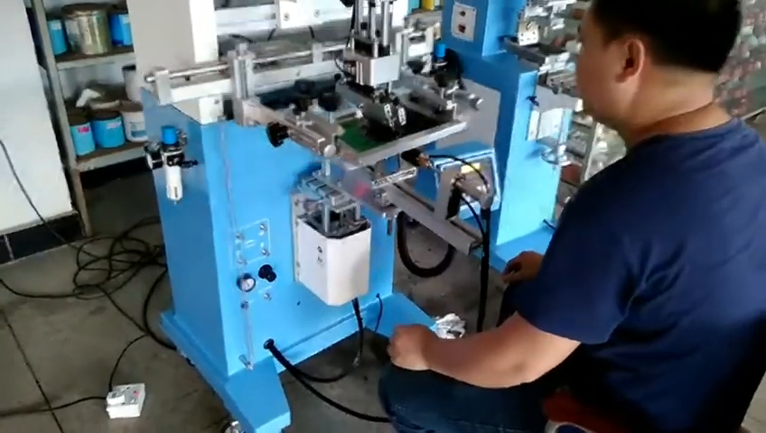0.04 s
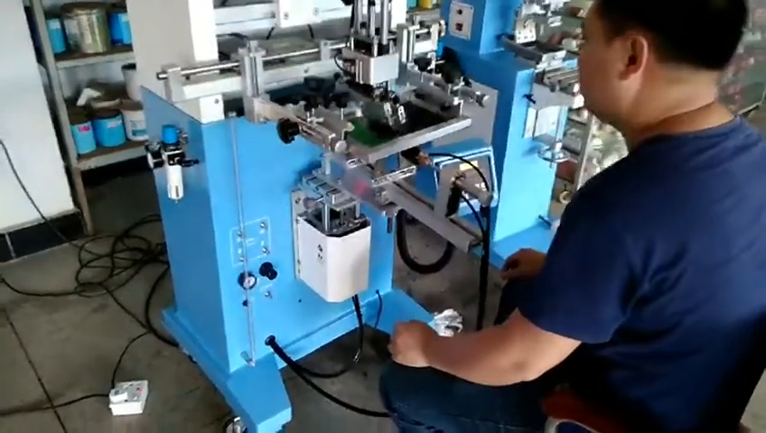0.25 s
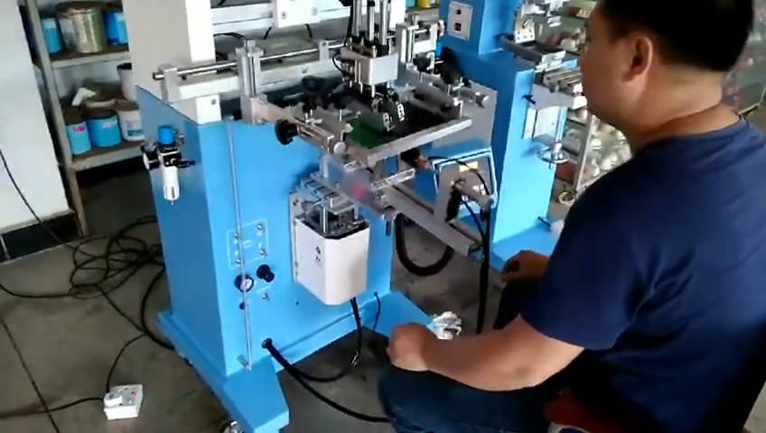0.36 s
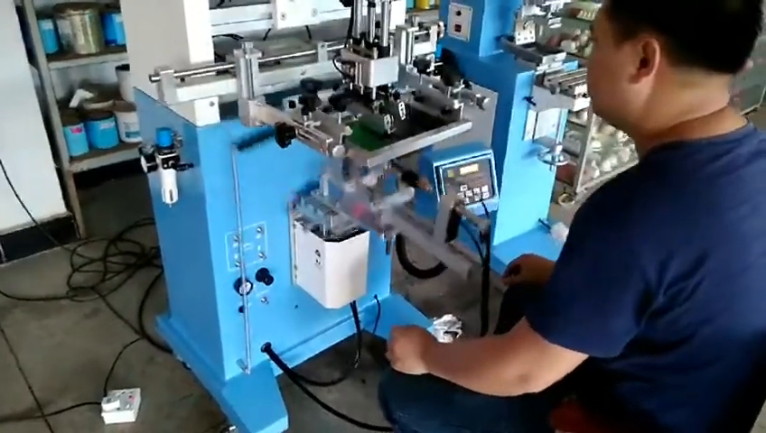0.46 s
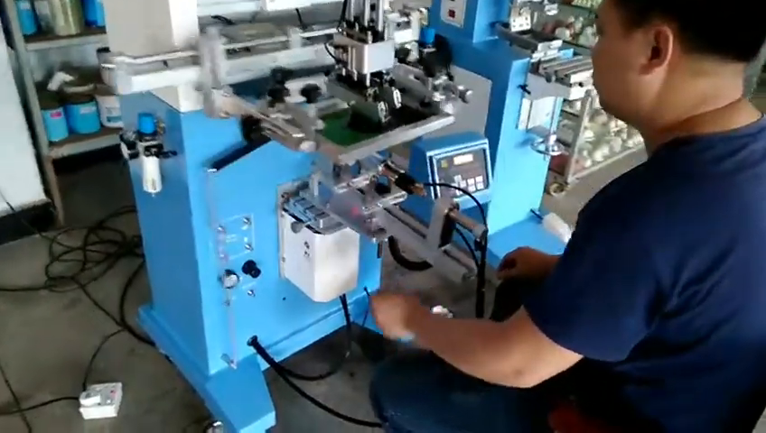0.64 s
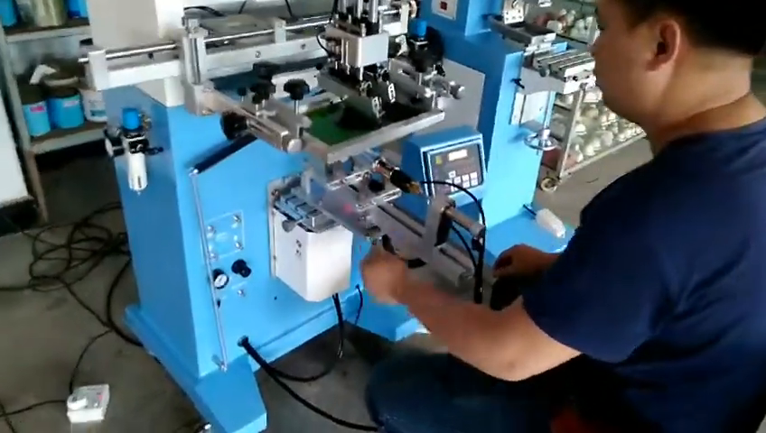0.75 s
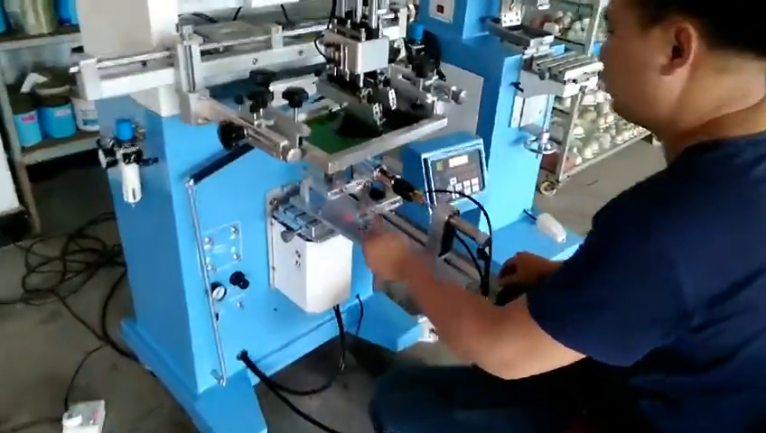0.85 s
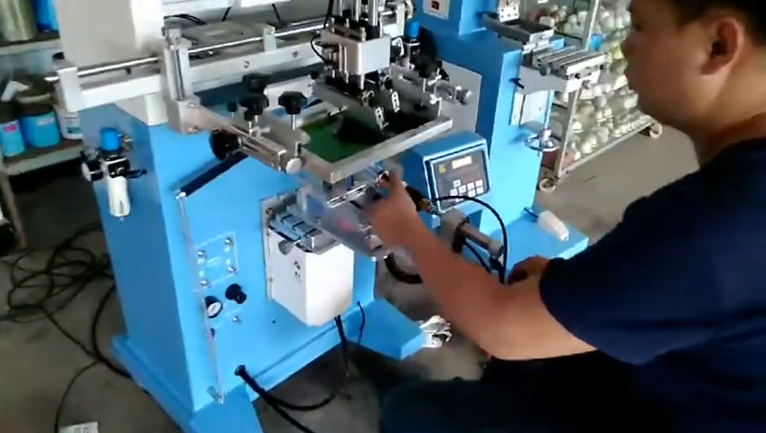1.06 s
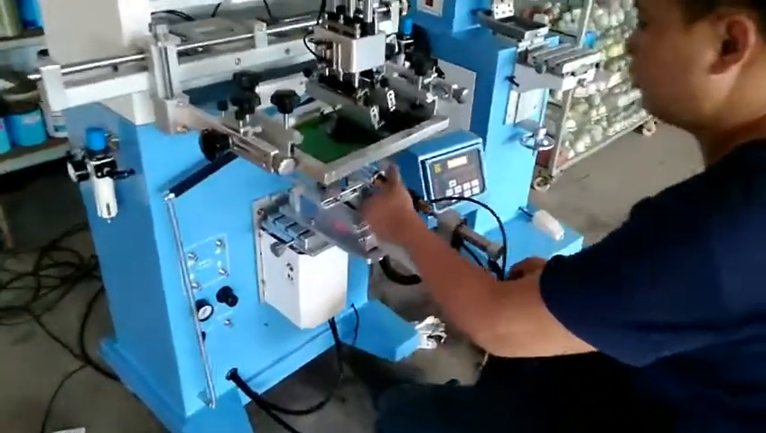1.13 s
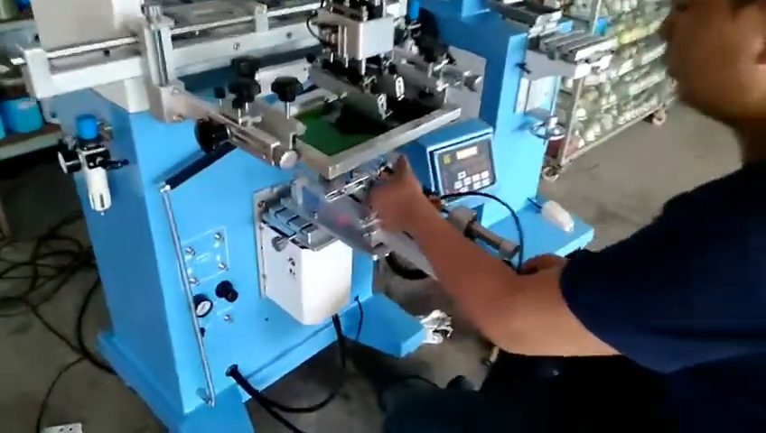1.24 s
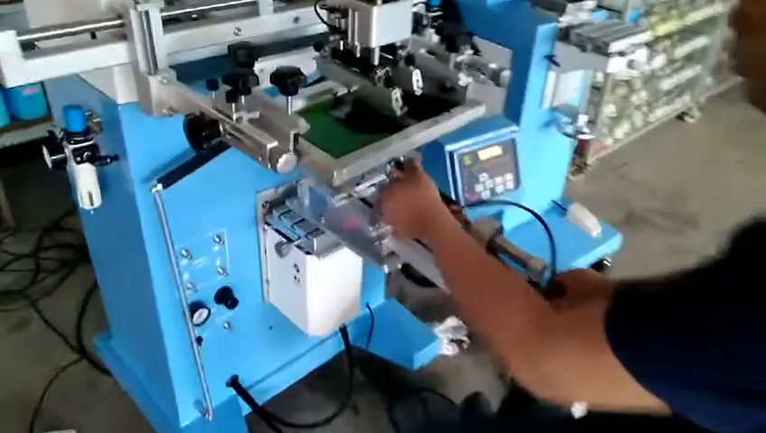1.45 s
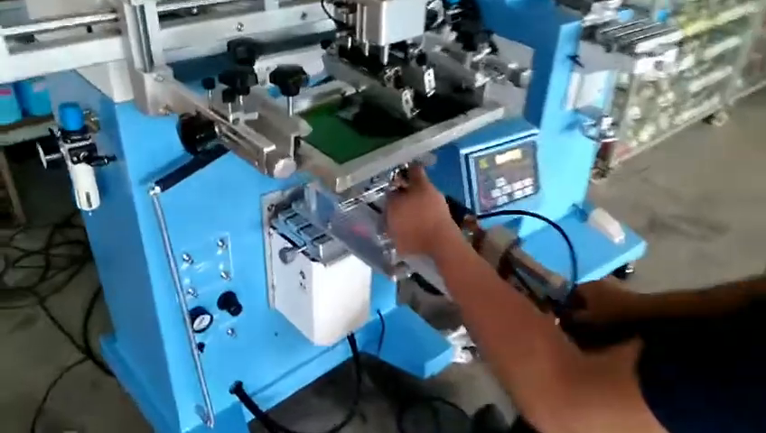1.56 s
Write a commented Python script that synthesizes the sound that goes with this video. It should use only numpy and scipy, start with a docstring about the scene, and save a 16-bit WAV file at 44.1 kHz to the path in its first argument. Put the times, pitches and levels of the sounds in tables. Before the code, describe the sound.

Compressed air hisses twice from a working printing machine, first thin and high, then fuller. Its sliding carriage drones low and clacks against steel, and a few soft thumps die away over quiet workshop noise.

```python
"""Two valves of a pneumatic screen-printing machine vent in turn: turbulent jets hiss through
their silencers, the first thin and bright, the second broad, with resonant peaks.
The machine makes one stroke: its carriage slides, sets the sheet-steel cabinet droning in its
normal modes and hits a stop. With the second hiss the rollers rumble, then impacts on the
steel rattle out over the faint noise of the workshop."""
import sys
import numpy as np
from scipy import signal
from scipy.fft import rfft, irfft
from scipy.io import wavfile
from scipy.ndimage import uniform_filter1d

SR = 44100
rng = np.random.default_rng(int(sys.argv[2]) if len(sys.argv) > 2 else 0)


def to_wav(sig):
    """Store sig (one row per channel, or 1-D mono) as 16-bit WAV at the path in sys.argv[1].

    Samples outside -1..1 are clipped; the rate is SR.
    """
    pcm = np.clip(np.atleast_2d(sig), -1, 1) * 32767
    pcm = np.round(pcm).astype(np.int16)
    wavfile.write(sys.argv[1], SR, pcm.T)  # frames by channels


N = 70560
TIME = np.arange(N) / SR
FREQS = np.maximum(np.arange(N // 2 + 1) * SR / N, 1)

# likeness of the sound at the two ears: f/Hz, coherence
COHERENCE = [(60, 0.97), (130, 0.96), (290, 0.94), (640, 0.67), (1400, 0.028), (15000, 0.032)]
# spectrum of the room noise: f/Hz, level/dB
ROOM_SPECTRUM = [(25, -23), (85, -6.5), (170, -8.5), (520, -17.5), (1200, -20), (2400, -20.5), (5000, -30),
                 (9000, -36.5), (12500, -30.5), (15500, -39.5)]
# normal modes of the cabinet: f/Hz, level/dB, T60/s
CABINET_MODES = [(56.6, -26, 0.13), (87.9, 2, 0.2), (124, -5, 0.36), (163.3, -2.5, 0.16),
                 (198.6, -4.5, 0.22), (235.4, -13.5, 0.24), (255, 1.5, 0.059), (282.3, 3, 0.15),
                 (332, 0.5, 0.18), (399, 1, 0.1)]
# runs of the carriage: t/s, rise/s, hold/s, release/(dB/s), low rumble/dB, upper rumble/dB, rubbing/dB
CARRIAGE_RUNS = [(-0.11, 0.43, 0.007, 119, -54.5, -47, -58), (0.397, 0.057, 0.018, 45, -40.5, -41, -59.5),
                 (0.64, 0.074, 0.12, 118, -32.5, -44, -55)]
# spectra of the two rolling excitations and of rail friction: f/Hz, level/dB
LOW_RUMBLE_SPECTRUM = [(25, -28), (45, -4.5), (65, 10), (90, 4), (115, 0), (160, 4), (230, 3), (270, -23.5),
                       (400, -50)]
UPPER_RUMBLE_SPECTRUM = [(180, -19.5), (270, -1.5), (340, 3.5), (410, -1.5), (500, -5), (750, -14.5),
                         (1100, -30.5), (2500, -63)]
RUB_SPECTRUM = [(400, -20), (650, 8.5), (1100, 1), (1500, 2), (2000, -6.5), (2700, 0.5), (4000, -13),
                (8000, -19.5)]
# impacts of steel parts: t/s, level/dB, f/Hz
PART_IMPACTS = [(0.125, -51.5, 805), (0.16, -56.5, 1450), (0.234, -50, 460), (0.245, -59, 2640),
                (0.255, -54, 1530), (0.353, -53.5, 1485), (0.455, -43.5, 606), (0.459, -51, 2650),
                (0.543, -55, 670), (0.673, -49.5, 795), (0.731, -49.5, 840), (0.786, -51.5, 980)]
# spectrum common to these impacts: f/Hz, level/dB
CLACK_SPECTRUM = [(300, -3), (650, 3.5), (1000, 1), (2600, -9), (4000, -26.5), (9000, -24.5)]
# blows on the cabinet: t/s, level/dB, bass gain/dB
CABINET_BLOWS = [(0.124, -51, -20), (0.234, -39, -3), (0.456, -34, -9), (0.665, -37.5, -7),
                 (0.754, -35, 1.5), (0.79, -36, -16), (0.819, -38.5, -13), (0.917, -49.5, 8.5),
                 (0.975, -55.5, 12), (1.014, -64, 17.5), (1.046, -53.5, 5.5)]
# frame modes excited by the carriage: t/s, level before swelling/dB, rise/s, hold/s, f/Hz
FRAME_DRONES = [(0.159, -33.5, 0.072, 0.062, 84.7), (0.18, -45, 0.011, 0.0084, 343.2),
                (0.25, -39.5, 0.036, 0.0059, 255.4), (0.29, -35.5, 0.0098, 0.0016, 224.2),
                (0.32, -39.5, 0.012, 0.0023, 161.6), (0.365, -29, 0.017, 0.018, 84.8),
                (0.673, -32.5, .015, 0.01, 165.2), (0.705, -37.5, 0.014, 0.1, 86.83),
                (0.551, -48.5, 0.038, 0.006, 85.5), (1.194, -50.5, 0.0092, 0.0027, 77.5)]
# air bursts of each valve: t/s, level/dB, hold/s, sag/(dB/s), release/(dB/s)
BRIGHT_BURSTS = [(0.302, -61, 0.0054, 42, 380), (0.341, -33, 0.12, 62, 211), (0.448, -42, 0.006, 80, 294),
                 (0.549, -52.5, .003, 80, 407), (0.976, -60, 0.005, 45, 250)]
BROAD_BURSTS = [(0.661, -43, 0.17, 29, 265)]
# spectrum of each jet: f/Hz, level/dB
BRIGHT_SPECTRUM = [(4000, -30.5), (7300, -25.5), (7750, -7), (9200, -14.5), (9700, -4), (11000, -4),
                   (12500, 3), (14500, -3.5), (15800, -2.5)]
BROAD_SPECTRUM = [(2500, -20), (4600, -17), (5200, -9), (7500, -13.5), (9200, -9), (10500, -1.5),
                  (12400, 4), (14400, -4.5), (15800, -4.5)]
# stereo balance of each jet: f/Hz, left minus right/dB
BRIGHT_BALANCE = [(5000, 3), (8500, 3.5), (10000, -1.5), (12000, -9), (14200, 6), (15500, -9)]
BROAD_BALANCE = [(3500, -5), (5500, 5.5), (6600, 16), (8300, 9), (9500, 1.5), (11200, -9), (12600, -3),
                 (14000, -1)]
# resonances of the second valve's silencer: f/Hz, boost/dB
SILENCER_MODES = [(7250, 9.5), (8590, 14), (9620, 15), (10570, 12.5), (11450, 5), (12550, 6.5), (14250, 11)]

VALVE_OPEN_S = 0.013


def from_db(db):
    """Amplitude ratio of a level in decibels."""
    return 10 ** (np.asarray(db) / 20)


def unit_power(x):
    """Normalisation to a mean square of one."""
    return x / np.sqrt(np.mean(x ** 2) + 1e-20)


def at_hz(points):
    """Interpolation of a table on a log-frequency axis."""
    hz, value = np.transpose(points)
    return np.interp(np.log(FREQS), np.log(hz), value)


def resonance(hz, width_hz, db):
    """A resonance peak: a Lorentzian boost in dB."""
    return db / (1 + (2 * (FREQS - hz) / width_hz) ** 2)


def pan(db):
    """Interaural level difference at constant total power."""
    gains = from_db(np.array([[.5], [-.5]]) * db)
    return gains / np.sqrt(np.mean(gains ** 2, axis=0))


def stereo(gain, source=None):
    """Partial coherence: a source (noise by default) and a diffuse part, filtered, at unit power."""
    mid, side = rfft(rng.standard_normal((2, N)))
    if source is not None:
        mid = rfft(unit_power(source))
    coherence = at_hz(COHERENCE)
    ears = np.sqrt(1 + coherence) * mid + np.sqrt(1 - coherence) * side * [[1], [-1]]
    return unit_power(irfft(gain * ears, N))


def envelope(start, rise, hold, sag, release):
    """Smooth onset and exponential decay in dB/s: sag until start + hold, release thereafter."""
    age = TIME - start
    opening = np.sin(np.pi / 2 * np.clip(age / rise, 0, 1)) ** 2
    return opening * from_db(-sag * np.clip(age, 0, hold) - release * np.maximum(age - hold, 0))


def flutter(depth_db, rate_hz):
    """Random amplitude modulation by low-passed noise."""
    wander = irfft(rfft(rng.standard_normal(N)) / (1 + (FREQS / rate_hz) ** 2), N)
    return from_db(depth_db * unit_power(wander))


def ring(impulses, hz, t60):
    """A damped oscillator answers each impulse with a decaying sine."""
    radius = np.exp(-np.log(1000) / (t60 * SR))
    angle = 2 * np.pi * hz / SR
    return signal.lfilter([0, np.sin(angle)], [1, -2 * radius * np.cos(angle), radius ** 2], impulses)


def panel_echoes(x, count=6, first_s=.002, span_s=.007, gain=0.31):
    """Comb filtering: reflections off the panels interfere with the direct sound at each ear."""
    lags = first_s + span_s * rng.random((2, count, 1))
    comb = 1 + gain * np.exp(-2j * np.pi * FREQS * lags).sum(axis=1)
    comb_rms = np.sqrt(np.mean(abs(comb) ** 2, axis=1, keepdims=True))
    return irfft(rfft(x) * comb / comb_rms, N)


def room_noise(level_db=-61):
    """Stationary background noise, diffuse in the treble."""
    return from_db(level_db) * stereo(from_db(at_hz(ROOM_SPECTRUM)))


def rumble(spectrum, bumps_per_s=500, spread_db=2, colour=0.72):
    """Shot noise: small random bumps of the rollers, filtered by the cabinet's modes."""
    bumps = (rng.random(N) < bumps_per_s / SR) * rng.choice([-1, 1], N)
    bumps = bumps * from_db(spread_db * rng.standard_normal(N))
    modes = sum(1 / (1 + ((FREQS - hz) * t60 / 2) ** 2) for hz, _, t60 in CABINET_MODES)
    rolling = stereo(from_db(at_hz(spectrum)) * (0.31 + modes) ** colour, bumps)
    local_power = uniform_filter1d(np.mean(rolling ** 2, axis=0), size=1100)
    return rolling / np.sqrt(local_power + 1e-6)  # evens out the level


def carriage():
    """Rolling and sliding friction on the rails grow and fade with each run; the runs add in power."""
    powers = sum((from_db(levels)[:, None] * envelope(t, rise, rise + hold, 0, release)) ** 2
                 for t, rise, hold, release, *levels in CARRIAGE_RUNS)
    low_gain, upper_gain, rub_gain = np.sqrt(powers)
    low = low_gain * flutter(depth_db=1.9, rate_hz=60) * rumble(LOW_RUMBLE_SPECTRUM)
    upper = upper_gain * rumble(UPPER_RUMBLE_SPECTRUM)
    rub_gain = rub_gain * flutter(depth_db=1.0, rate_hz=160)
    return low + upper + rub_gain * panel_echoes(stereo(from_db(at_hz(RUB_SPECTRUM))))


def clacks(attack_s=.0015, t60=0.24):
    """Impact noise peaks at each steel part's resonance and decays exponentially in the room."""
    sound = 0
    for t, db, hz in PART_IMPACTS:
        spectrum_db = at_hz(CLACK_SPECTRUM) + resonance(hz, width_hz=0.18 * hz, db=13)
        sound += from_db(db) * envelope(t, attack_s, 0, 0, 60 / t60) * stereo(from_db(spectrum_db))
    return sound


def knocks(bass_hz=200, lowest_hz=51, contact_hz=1500, spread_db=1.2):
    """Free vibration: each blow rings the cabinet's modes; the contact time limits the treble."""
    t, db, bass_db = np.transpose(CABINET_BLOWS)
    body = 0
    for hz, mode_db, t60 in CABINET_MODES:
        levels = db + mode_db + bass_db * (hz < bass_hz) + rng.normal(0, spread_db, len(t))
        impulses = np.zeros(N)
        impulses[(t * SR).astype(int)] = from_db(levels) * rng.choice([-1, 1], len(t))
        body += ring(impulses, hz, t60)
    return signal.sosfilt(signal.butter(2, [lowest_hz, contact_hz], "band", fs=SR, output="sos"), body)


def drone(swell_db_per_s=54, release_db_per_s=219):
    """Resonance: single modes of the frame build up as the carriage judders, then damp out."""
    judder = flutter(depth_db=1.6, rate_hz=55)
    modes = 0
    for t, db, rise, hold, hz in FRAME_DRONES:
        amplitude = from_db(db) * envelope(t, rise, rise + hold, -swell_db_per_s, release_db_per_s)
        modes += amplitude * np.sqrt(2) * np.sin(2 * np.pi * hz * (TIME - t))
    return judder * modes


def airflow(bursts):
    """Incoherent addition: the bursts of a valve sum in power."""
    return np.sqrt(sum((from_db(db) * envelope(t, VALVE_OPEN_S, hold, sag, release)) ** 2
                       for t, db, hold, sag, release in bursts))


def low_shelf(jet, gain, split_hz):
    """Shelving filter: a time-varying gain acts on the band below the split."""
    low = irfft(rfft(jet) / (1 + (FREQS / split_hz) ** 20), N)
    return jet - low + low * gain


def bright_valve(low_sag_db_per_s=63):
    """Turbulent noise of a fine jet: as the cylinder's pressure falls, the lower band fades first."""
    jet = stereo(from_db(at_hz(BRIGHT_SPECTRUM)) * pan(at_hz(BRIGHT_BALANCE)))
    main_burst_s = BRIGHT_BURSTS[1][0]
    low_gain = from_db(-low_sag_db_per_s * np.maximum(TIME - main_burst_s, 0))
    hiss = low_shelf(jet, low_gain, split_hz=9100)
    return airflow(BRIGHT_BURSTS) * flutter(depth_db=0.7, rate_hz=37) * hiss


def broad_valve(low_boost_db=14.5):
    """A wider jet excites its silencer's resonances; the lower band swells, then falls with pressure."""
    whistles_db = sum(resonance(hz, width_hz=240, db=db) for hz, db in SILENCER_MODES)
    jet = stereo(from_db(at_hz(BROAD_SPECTRUM) + whistles_db) * pan(at_hz(BROAD_BALANCE)))
    swell_start = BROAD_BURSTS[0][0] - VALVE_OPEN_S
    low_gain = from_db(low_boost_db) * envelope(swell_start, rise=.045, hold=0.14, sag=76, release=198)
    hiss = low_shelf(jet, low_gain, split_hz=9600)
    return airflow(BROAD_BURSTS) * flutter(depth_db=1.46, rate_hz=55) * hiss


def scene():
    """Superposition of structure-borne sound, jet noise and the room's background."""
    machine = (drone() + knocks() + clacks() + carriage()) * pan(db=-1.9)
    valves = panel_echoes(bright_valve() + broad_valve())
    return room_noise() + machine + valves


def record(dry):
    """Band limiting: an elliptic low-pass cuts the highest treble steeply."""
    cutoff_hz = 15700
    return signal.sosfilt(signal.ellip(12, .1, 80, cutoff_hz, fs=SR, output="sos"), dry)


dry = scene()
out = record(dry)
to_wav(out)
```